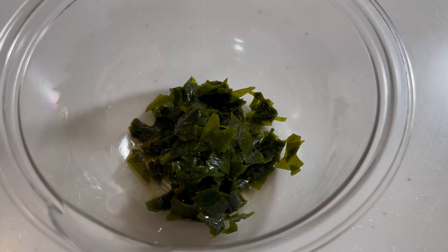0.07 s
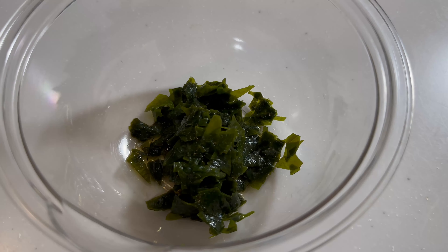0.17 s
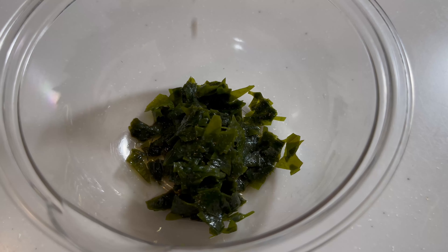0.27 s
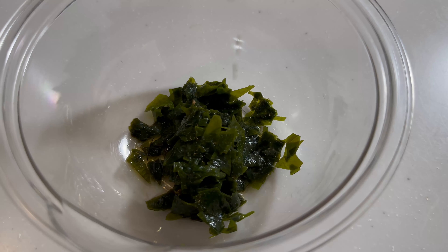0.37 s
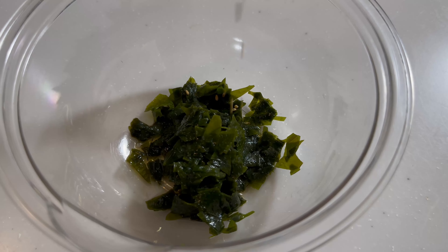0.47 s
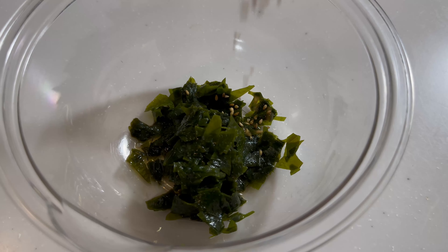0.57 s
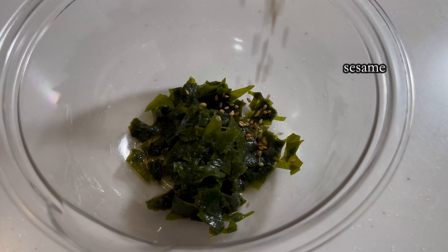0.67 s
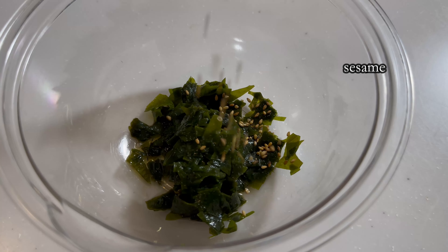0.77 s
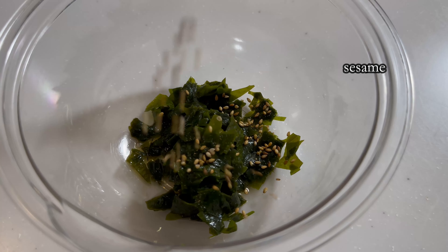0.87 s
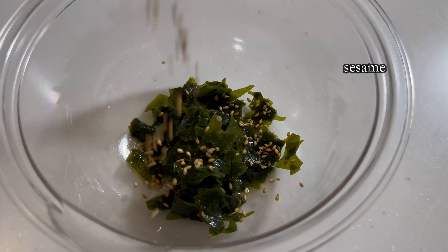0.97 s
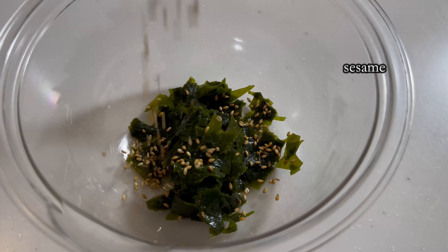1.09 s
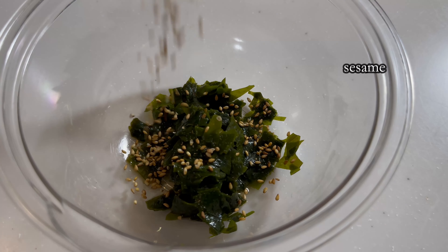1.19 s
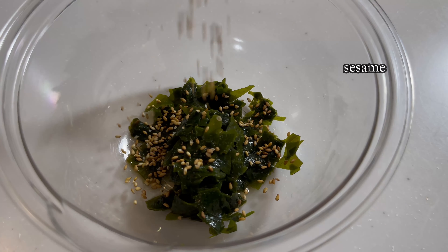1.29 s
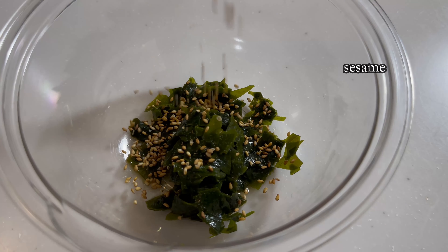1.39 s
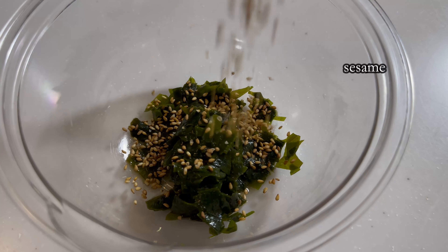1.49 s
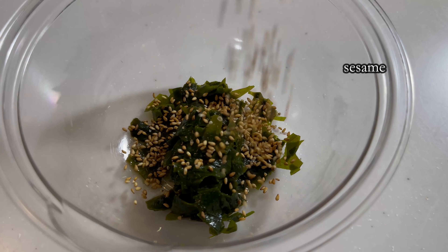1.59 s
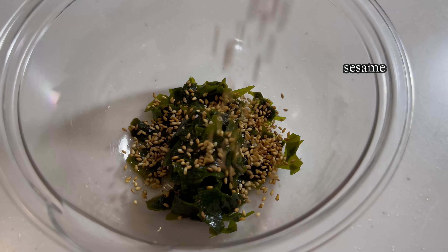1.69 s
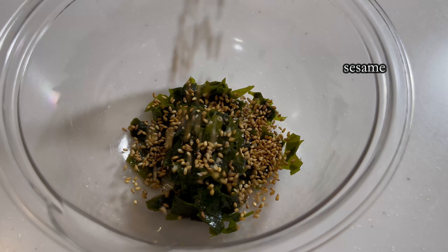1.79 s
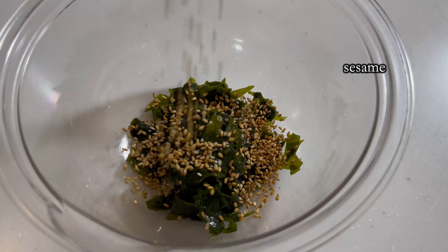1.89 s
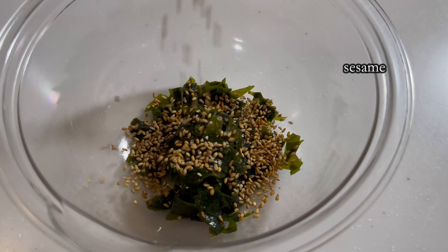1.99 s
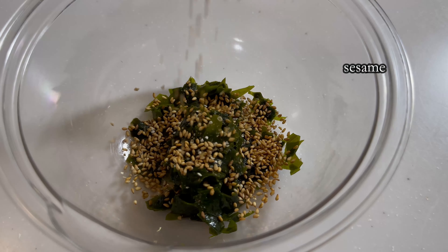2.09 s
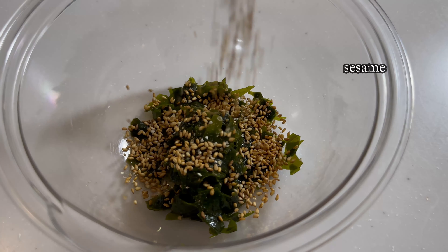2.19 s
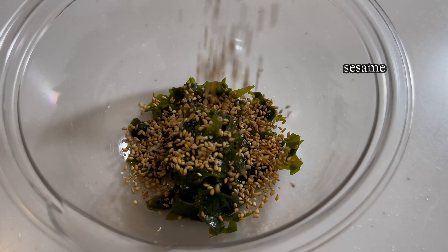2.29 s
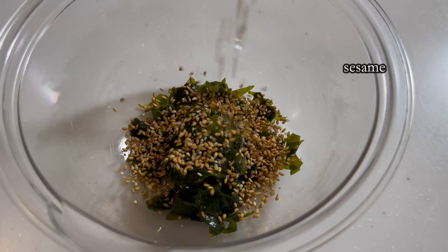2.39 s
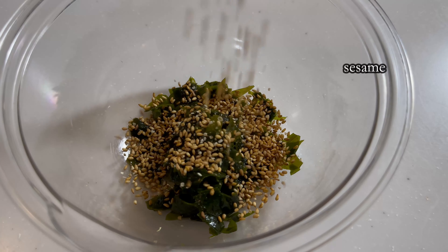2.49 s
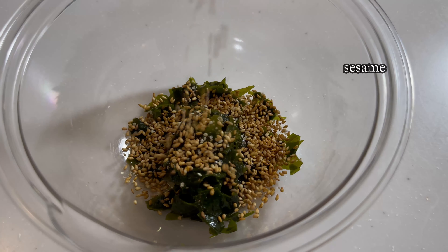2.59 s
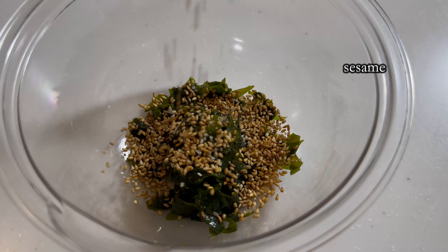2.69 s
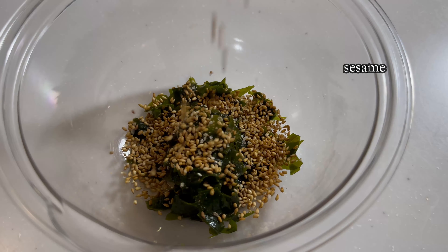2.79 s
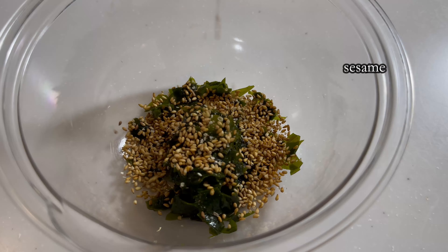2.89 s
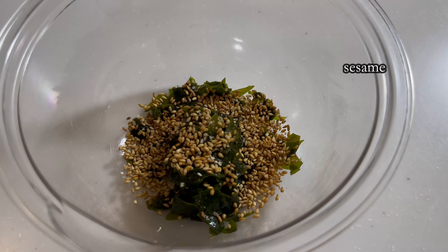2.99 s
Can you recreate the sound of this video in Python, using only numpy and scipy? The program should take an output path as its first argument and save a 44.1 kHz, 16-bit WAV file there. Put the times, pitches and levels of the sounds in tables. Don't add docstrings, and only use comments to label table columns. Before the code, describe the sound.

Sesame seeds are tapped out of a bag about seven times a second; crackling knocks and dry rattles lead, then fine seed clicks thicken and thin out, heard very close over a faint low appliance hum.

```python
import sys
import numpy as np
from scipy import signal
from scipy.fft import rfft, irfft, next_fast_len
from scipy.io import wavfile
from scipy.ndimage import map_coordinates

SR = 44100
rng = np.random.default_rng(int(sys.argv[2]) if len(sys.argv) > 2 else 0)


def file_out(sig):
    cols = np.atleast_2d(sig).T
    lim = np.clip(cols, -1, 1)
    pcm = np.round(lim * 32767).astype(np.int16)
    wavfile.write(sys.argv[1], SR, pcm)


def decibels_to_gain(level_db):
    exponent = np.asarray(level_db, float) / 20
    return 10 ** exponent


N = 134505

# start in seconds, knock in dB, thump in dB, crack in dB, thump depth in dB per octave.
TAPS = [(0.242, -23, -34, -28, -0.7), (0.382, -19.5, -33.5, -35, 0.4), (0.542, -29, -38.5, -39.5, 2),
        (0.685, -27.5, -38, -40.5, 3.5), (0.845, -25, -38, -28, -0.2), (0.991, -26.5, -36, -32.5, -0.7),
        (1.14, -25.5, -40, -37.5, -0.4), (1.285, -17, -36, -27, -0.1), (1.446, -27.5, -39, -64, 0.3),
        (1.588, -32, -39, -46, 2.1), (1.754, -35.5, -42.5, -55, -0.6), (1.896, -27, -38, -54, -0.2),
        (2.043, -19.5, -29, -26, -1.2), (2.209, -38.5, -46.5, -51, 2.1), (2.343, -30, -39.5, -47, 0.6),
        (2.502, -26.5, -38, -51.5, 0), (2.663, -39.5, -46.5, -42, 2.6)]
HOLLOW_NOTES = [1330, 1260, 1050, 1080, 1180, 1080, 1150, 1120, 1050, 880, 1100, 1074, 1190, 1000, 1050,
                1100, 1030]
# frequency in Hz, level in dB.
THUMP = [(48, -38), (68, 0.5), (110, 0), (180, 0), (260, 2), (400, -5.5), (560, -10), (900, -22.5),
         (1300, -36)]
# lag at 300 Hz in seconds, offset in seconds,
# phase turn in rad, level in dB, tilt in dB per octave.
SWEEP = [(.0052, -.001, 3.85, 10.8, -0.78), (.0034, .0018, 6.15, 10.3, -0.63)]
# frequency in Hz, width in Hz, level in dB.
BAG = [(1155, 186, 6), (1234, 160, -0.5), (1420, 120, 4.5), (1933, 67, -2.5), (2144, 190, 1),
       (3580, 290, -6)]
# frequency in Hz, level in dB.
CRACK = [(1500, -26), (3000, -10), (5000, -3), (7000, -4), (10500, 3), (13000, 1), (16000, -10)]
# frequency in Hz, level in dB per Hz.
SHAKE = [(300, -31), (550, -7), (1100, -8), (2260, -4.5), (4500, -8), (7500, -11), (11000, -6.5),
         (16000, -13.5)]
# start in seconds, level in dB against a mean shake.
SLIDE = [(0.154, -5.5)]
# frequency in Hz, share.
APART = [(400, 0.48), (1500, 0.46), (4000, 0.51), (8000, 0.57), (11500, 0.045), (15000, 0.54)]
# time in seconds, level in dB.
FLOW = [(0.0, -78.5), (0.179, -72.5), (0.31, -84), (0.39, -62.5), (0.7, -60.5), (0.93, -58), (1.15, -53),
        (1.41, -51.5), (1.62, -50.5), (1.73, -55), (1.78, -52.5), (1.84, -45.5), (1.97, -52.5),
        (2.07, -54.5), (2.4, -51.5), (2.73, -58.5), (2.92, -62), (3.05, -81)]
# start in seconds, shell click peak in dB, glass ring
# level in dB.
TICKS = [(0.064, -40.5, -61.5), (0.591, -28, -51.5), (0.6048, -35, -48), (0.825, -34, -46.5),
         (0.938, -30.5, -46.5), (1.066, -35, -76), (1.2325, -34, -52), (1.4208, -28, -60),
         (1.512, -25, -45.5), (1.5347, -30, -45.5), (1.6483, -27, -48), (1.6574, -25, -45),
         (1.7415, -36, -70), (1.798, -33, -50), (1.8124, -25.5, -50), (1.8293, -25, -48.5),
         (1.8464, -23, -42.5), (2.1093, -22.5, -52), (2.1547, -28, -52.5), (2.178, -25, -43),
         (2.3003, -30, -61), (2.4294, -26, -53.5), (2.7087, -32, -64), (2.7585, -34, -63),
         (2.7749, -24.5, -49), (2.797, -32.5, -45.5), (2.8133, -31, -50.5), (2.8972, -39, -55.5),
         (2.9527, -34, -56), (2.9816, -39, -72),
         (0.65, -38, -57), (1.3237, -23, -45), (1.4757, -28, -51), (1.4918, -41, -40), (1.87, -31, -52),
          (2.2555, -26, -54.5), (2.4734, -33, -48.5), (2.837, -38, -64), (2.851, -39, -64),
          (2.913, -40, -73), (2.9352, -42, -81), (3.0051, -42, -71), (3.0404, -54, -67),
         (0.515, -44, -56), (0.551, -33, -50), (0.656, -40, -54), (0.670, -40, -56), (0.694, -31, -47),
          (0.771, -40, -54), (0.9484, -35, -48), (0.955, -36, -48), (0.9714, -35, -50), (1.0435, -38, -60),
          (1.049, -36, -58), (1.0816, -33, -49), (1.095, -39, -54), (1.1097, -36, -47), (1.2505, -36, -41),
          (1.264, -35, -47), (1.3385, -30, -50), (1.5836, -32, -53), (1.9639, -34, -58), (1.992, -36, -50),
          (2.023, -37, -51), (2.0872, -28, -48), (2.1222, -33, -54), (2.2367, -31, -53), (2.2749, -37, -52),
          (2.3142, -35, -47), (2.3896, -34, -50), (2.4444, -36, -52), (2.5701, -38, -60), (2.602, -39, -52),
          (2.612, -40, -53), (2.622, -40, -51), (2.638, -43, -50), (2.7312, -39, -58)]
# frequency in Hz, width in Hz, level in dB.
GLASS = [(3020, 1100, -6), (3680, 320, -1), (4080, 260, -0.5), (4855, 420, -1), (5390, 820, -4),
         (6860, 2150, -3)]
# frequency in Hz, width in Hz, level in dB.
SHELL = [(9600, 1900, -7), (10580, 2100, 2), (12800, 2800, -0.5), (14740, 1400, -4.5)]
# frequency in Hz, lead of the left in rad.
LEAD = [(300, 0.19), (600, 1.3), (1300, 0.4), (2500, 1.1), (6700, 1.3), (8400, 5.1), (10000, 5.6),
        (16000, 5.5)]
# frequency in Hz, share of a source's left lean.
LEFTWARD = [(300, 1.15), (1300, 0.2), (2400, 0.12), (4400, 1.4), (8000, 0.72), (12000, -0.25)]
# frequency in Hz, T60 in seconds.
ROOM = [(200, 0.093), (2000, 0.54), (10000, 0.02)]
# frequency in Hz, level in dB.
HUM = [(32.5, -60.5), (65, -61), (97, -57.5), (130, -56.5)]
# frequency in Hz, level in dB per Hz.
AIR = [(13, -11), (22, -11), (118, -13), (189, -13), (286, -13.5), (366, -14), (585, -19), (815, -23.5),
       (16000, -74.5)]
# frequency in Hz, correlation.
ALIKE = [(60, -0.1), (130, 0.58), (300, 0.67), (640, -0.38), (1400, -0.083), (7000, 0.86), (15000, 0.88)]
# frequency in Hz, gain in dB.
MIC = [(7000, 0), (7600, -5), (8300, 0), (15900, 0), (16000, -40), (17000, -46)]

ASIDE_DB = -2.5


def unit(x):
    return x / np.sqrt(np.mean(x ** 2) + 1e-20)


def peak(x):
    return x / np.abs(x).max()


def along(points, hz):
    f, v = np.transpose(points)
    return np.interp(np.log(hz + 1), np.log(f + 1), v)


def wobble(rate):
    knots = rng.standard_normal(int(N * rate / SR) + 4)
    return map_coordinates(knots, [np.arange(N) * rate / SR])


def filtered(x, response):
    m = next_fast_len(x.shape[-1] + SR // 4)
    return irfft(rfft(x, m) * response(np.fft.rfftfreq(m, 1 / SR)), m)[..., :x.shape[-1]]


def rings(peaks, scatter_db=0):
    gains = decibels_to_gain(scatter_db * rng.standard_normal(len(peaks)))

    def response(f):
        total = 0
        for k, (hz, width, db) in enumerate(peaks):
            damping = 1j * f * width
            total = total + (-1) ** k * gains[k] * decibels_to_gain(db) * damping / (hz * hz - f * f + damping)
        return total
    return response


def add(track, s, sound):
    part = track[..., round(s * SR):][..., :sound.shape[-1]]
    part += sound[..., :part.shape[-1]]


def ports(x, pan_db):
    def response(f):
        left = .5j * along(LEAD, f) + np.log(decibels_to_gain(pan_db * along(LEFTWARD, f)))
        return np.exp(np.outer([1, -1], left))
    return filtered(x, response)


def patter(rate, spread_db, t60, channels=1):
    chance, size = rng.random((2, N))
    hits = (chance < rate / SR) * decibels_to_gain(spread_db * np.minimum(-np.log(size + 1e-9), 3))
    t = np.arange(900) / SR
    swell = signal.fftconvolve(hits, decibels_to_gain(-60 * t / t60) * (1 - np.exp(-t / 0.00042)))[:N]
    return unit(swell * rng.standard_normal((channels, N)))


def tap_thumps():
    law, slowing = 1.15, -0.035
    out = np.zeros((2, N))
    blow = np.eye(1, 3000, 200)[0]
    lag, offset, turn, port_db, port_tilt = np.transpose(SWEEP)[:, :, None]

    def bend(r):
        return 300 * r ** (1 - law) / (law - 1)

    for s, _, thump_db, _, depth in TAPS:
        def sweep(f):
            r = np.maximum(f, 20) / 300
            below = bend(r) - bend(4 / 3) + (f - 400) * (4 / 3) ** -law
            slow = slowing * depth * (r < 4 / 3) * below
            phase = 2 * np.pi * (lag * (bend(r) + slow) - f * offset) + turn
            level_db = along(THUMP, f) - (1.75 * depth - port_tilt) * np.log2(r * 1.5)
            return decibels_to_gain(level_db) * np.exp(1j * phase)
        wave = filtered(blow, sweep)
        wave = wave / np.abs(wave).max(1, keepdims=True)
        add(out, s - 200 / SR, wave * decibels_to_gain(thump_db + port_db))
    return out


def crack():
    t = np.arange(3000) / SR
    snap_hz, fuzz, t60 = 10800, .8, .0016
    snap = np.sin(2 * np.pi * snap_hz * t) + fuzz * rng.standard_normal(len(t))
    return peak(snap * decibels_to_gain(-60 * t / t60) * t)


def knock(hollow_hz, missing_crack_db):
    blow = np.eye(1, 2805, 5)[0]
    bag = rings([(hollow_hz, 181, 7)] + BAG[3:], scatter_db=2.0)

    def struck(f):
        return bag(f) * decibels_to_gain(0.94 * missing_crack_db * np.log2(1 + f / 1500))
    return peak(filtered(blow, struck))


def tap_clicks():
    knocks, cracks = np.zeros((2, N))
    for (s, knock_db, _, crack_db, _), hz in zip(TAPS, HOLLOW_NOTES):
        add(cracks, s + 0.00043, decibels_to_gain(crack_db + 11) * crack())
        missing_db = min(crack_db - knock_db + 17.0, 0)
        add(knocks, s + .0009, decibels_to_gain(knock_db + 0.5) * knock(hz, missing_db))
    return knocks, filtered(cracks, lambda f: decibels_to_gain(along(CRACK, f)))


def shake():
    level, t = np.zeros(N), np.arange(SR // 2) / SR
    lead_in_s, rise_s, t60 = 0.0037, 0.0038, 0.33
    jolts = []
    for s, knock_db, thump_db, *_ in TAPS:
        jolts.append((s - lead_in_s, .55 * (knock_db + 28) + 0.41 * (thump_db + 37)))
    for s, db in jolts + SLIDE:
        add(level, s, decibels_to_gain(-39.5 + db - 60 * t / t60) * (1 - np.exp(-t / rise_s)))
    near, apart = patter(2000, spread_db=2.6, t60=.022, channels=2)
    differing = filtered(apart, lambda f: 1.32 * along(APART, f))
    pair = ports(near, pan_db=5.0) + differing * [[1], [-1]]
    uneven = decibels_to_gain(1.6 * wobble(40.22))
    bag = rings(BAG)
    rattle = filtered(pair, lambda f: decibels_to_gain(along(SHAKE, f)) * (1 + 0.67 * np.abs(bag(f))))
    return level * uneven * unit(rattle)


def falling_stream():
    rate, fall_s = 510, 0.019
    t = np.arange(N) / SR
    s, db = np.transpose(FLOW)
    flow = decibels_to_gain(-3 + np.interp(t, s, db) + 3.4 * wobble(25.0))
    tap_count = np.interp(t - fall_s, [row[0] for row in TAPS], np.arange(len(TAPS)))
    flow *= decibels_to_gain(2.5 * np.cos(2 * np.pi * tap_count))
    dry, glass, apart = patter(rate, spread_db=3.5, t60=0.015, channels=3)
    dry = dry + .6 * patter(rate * 1.5, spread_db=3, t60=.004)[0]
    heap = unit(filtered(dry, rings(SHELL)))
    bowl = decibels_to_gain(2) * unit(filtered(glass, rings(GLASS)))
    aside = flow * decibels_to_gain(ASIDE_DB) * unit(filtered(apart, rings(GLASS)))
    return flow * (heap + bowl), aside


def single_landings():
    out, aside = np.zeros((2, N))
    t = np.arange(1500) / SR
    contact = decibels_to_gain(-60 * t / 0.0089) * (1 - np.exp(-t / .0009))
    for s, shell_db, glass_db in TICKS:
        hit, other = rng.standard_normal((2, len(t))) * contact
        ring = decibels_to_gain(glass_db + 15.5)
        add(out, s, decibels_to_gain(shell_db - 5.5) * peak(filtered(hit, rings(SHELL, scatter_db=1.5))))
        add(out, s, ring * peak(filtered(hit, rings(GLASS, scatter_db=2.0))))
        add(aside, s, ring * decibels_to_gain(ASIDE_DB) * peak(filtered(other, rings(GLASS, scatter_db=13.0))))
    return out, aside


def room(x):
    hz, t, z = signal.stft(rng.standard_normal((2, SR // 2)), SR, nperseg=256)
    fading = z * decibels_to_gain(-60 * t / along(ROOM, hz)[:, None])
    tail = signal.istft(fading, SR, nperseg=256)[1]
    late = np.pad(x, (100, 0))[None]
    return signal.fftconvolve(late, tail / np.linalg.norm(tail[0]), axes=1)[:, :N]


def appliance_hum():
    t = np.arange(N) / SR
    hum = np.zeros(N)
    for hz, db in HUM:
        sway = decibels_to_gain(db + 0.5 + 2.5 * wobble(9))
        hum += sway * np.sin(2 * np.pi * hz * t + wobble(8.7))
    return hum * decibels_to_gain([[1.2], [-1.2]])


def still_air():
    def spread(f):
        turn = np.arccos(np.clip(along(ALIKE, f), -1, 1)) / 2
        return decibels_to_gain(along(AIR, f)) * [np.cos(turn), np.sin(turn)]
    mid, side = filtered(rng.standard_normal((2, N)), spread)
    return decibels_to_gain(-55.5) * unit(np.array([mid + side, mid - side]))


def scene():
    thumps = tap_thumps()
    knocks, cracks = tap_clicks()
    taps = thumps + ports(knocks, pan_db=4.5) + ports(cracks, pan_db=9.5)
    stream, stream_aside = falling_stream()
    ticks, ticks_aside = single_landings()
    fall = stream + ticks
    seeds = ports(fall, pan_db=1.24) + (stream_aside + ticks_aside) * [[1], [-1]]
    wet = decibels_to_gain(-12) * room(knocks + cracks) + decibels_to_gain(-11) * room(fall) + decibels_to_gain(-13.5) * room(thumps[0])
    return taps + seeds + wet + shake() + appliance_hum() + still_air()


def top_cut(x):
    return signal.sosfilt(signal.butter(12, 16970, fs=SR, output="sos"), x)


def record(dry):
    mix = filtered(dry, lambda f: decibels_to_gain(along(MIC, f)))
    return top_cut(mix)


dry = scene()
out = record(dry)
file_out(out)
```